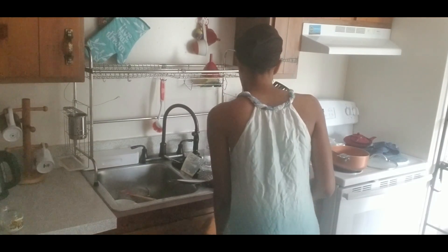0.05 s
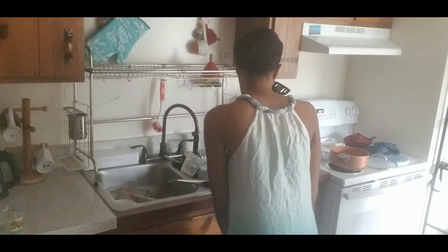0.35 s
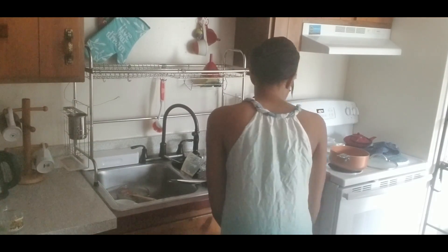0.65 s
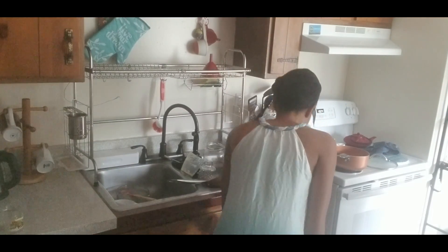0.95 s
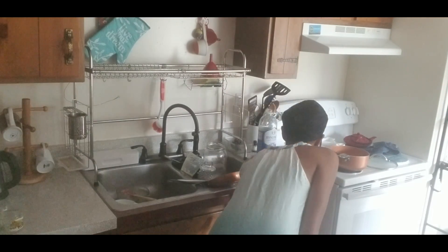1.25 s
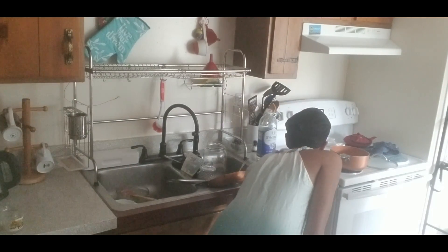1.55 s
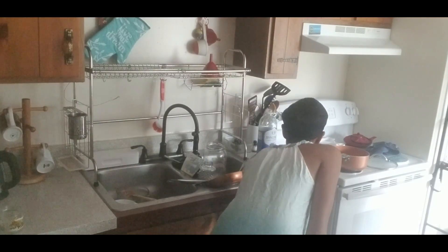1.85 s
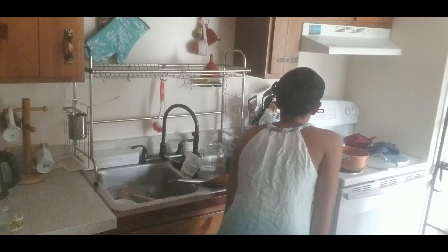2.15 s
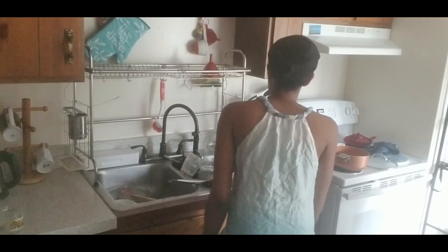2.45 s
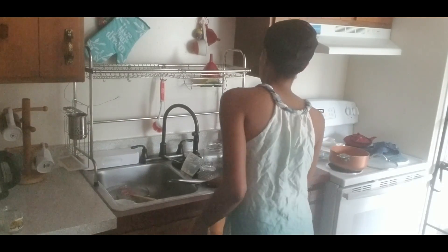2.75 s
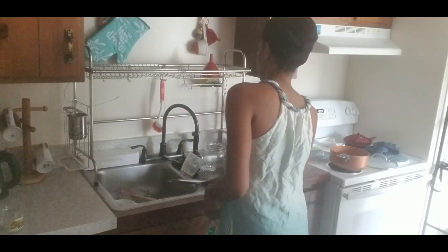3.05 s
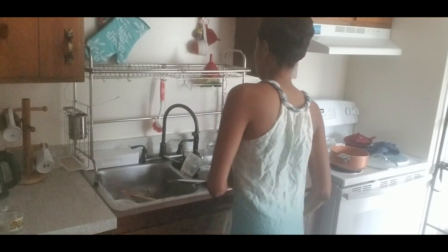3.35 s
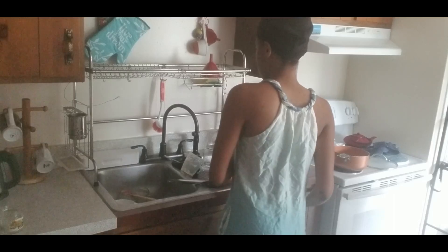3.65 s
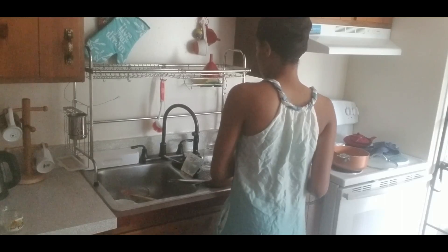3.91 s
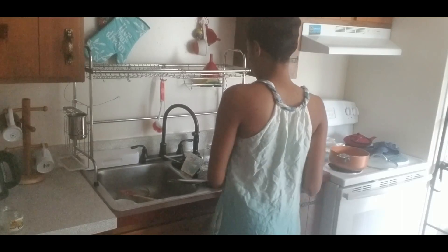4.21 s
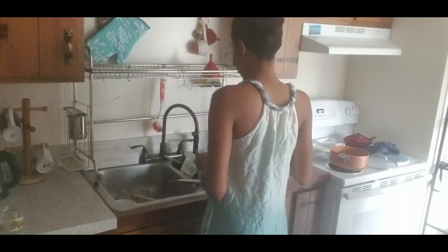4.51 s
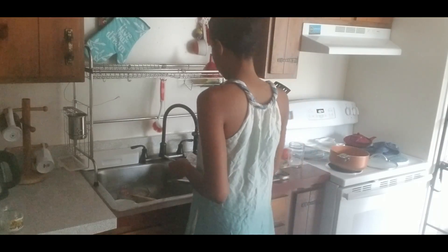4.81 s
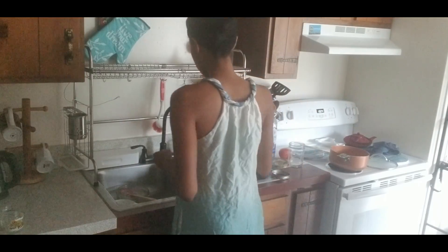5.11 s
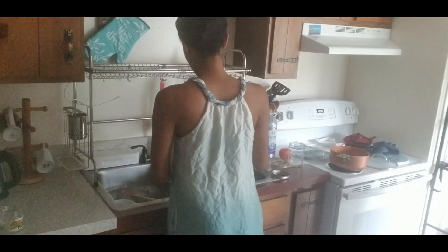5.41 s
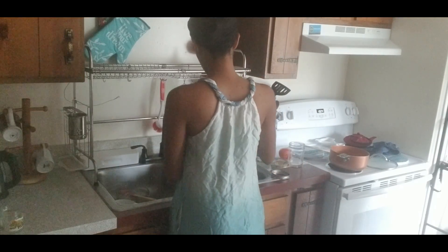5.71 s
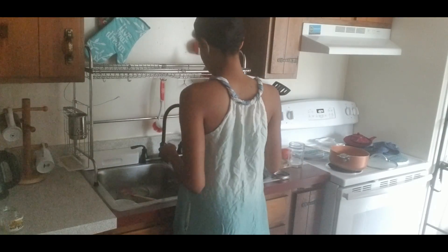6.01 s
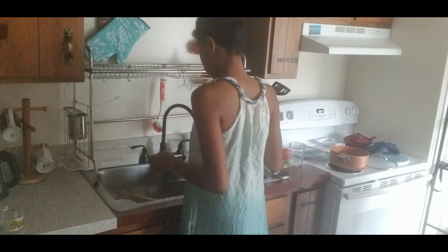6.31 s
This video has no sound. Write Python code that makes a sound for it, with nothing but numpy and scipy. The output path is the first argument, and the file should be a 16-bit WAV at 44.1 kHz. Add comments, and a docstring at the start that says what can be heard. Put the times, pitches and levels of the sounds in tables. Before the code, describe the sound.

Over a low fridge hum, dishes knock, a cupboard door clacks and something heavy slides with deep thumps, then a tap handle squeaks.

```python
"""A refrigerator hums in a small hard kitchen, and a cupboard door clacks, its steel catch ringing.
A couple of metres from the microphone, on the left, someone works at a steel sink. A hollow container
is picked up with a low hoot; dishes knock and set the cabinet's panels booming, and something heavy
slides. The tap handle sticks and slips in a squeak, its lever clicks, and at the very end water hisses."""
import sys
import numpy as np
from scipy import signal
from scipy.fft import rfft, irfft, next_fast_len
from scipy.io import wavfile
from scipy.ndimage import uniform_filter1d

SR = 44100
rng = np.random.default_rng(int(sys.argv[2]) if len(sys.argv) > 2 else 0)


def generate_wav(sig):
    """Save sig (samples, or channels by samples) to the path in sys.argv[1] as 16-bit PCM at SR."""
    pcm = np.round(np.clip(np.atleast_2d(sig).T, -1, 1) * 32767).astype(np.int16)
    wavfile.write(sys.argv[1], SR, pcm)


N = 280719
TIME = np.arange(N) / SR
HIT_TIME = TIME[:SR * 4 // 5]


def undb(db):
    """Decibels to gain."""
    return 10 ** (np.asarray(db) / 20)


def rms(x):
    """Root mean square."""
    return np.sqrt(np.mean(x ** 2)) + 1e-12


def on_log_axis(hz, points):
    """Read (frequency, value) points on a log-frequency axis."""
    point_hz, value = np.transpose(points)
    return np.interp(np.log(hz + 1e-3), np.log(point_hz), value)


def colour(x, points):
    """Minimum-phase filter through (frequency [Hz], gain [dB]) points."""
    size = 2 * next_fast_len(x.shape[-1])
    gain = undb(on_log_axis(np.fft.rfftfreq(size, 1 / SR), points))
    cepstrum = irfft(np.log(gain))
    cepstrum[1:size // 2] *= 2
    cepstrum[size // 2 + 1:] = 0
    return irfft(rfft(x, size) * np.exp(rfft(cepstrum)))[..., :x.shape[-1]]


def band(x, lo, hi):
    """Steep band-pass."""
    return signal.sosfilt(signal.butter(4, [lo, min(hi, .49 * SR)], "band", fs=SR, output="sos"), x)


def wander(rate_hz):
    """Smooth random motion with a spread near 1."""
    size = int(SR / rate_hz)
    return uniform_filter1d(np.repeat(rng.standard_normal(N // size + 1), size), size)[:N]


def white_pair(size, alike):
    """White noise at two microphones; `alike` is the share of power common to both."""
    common, *own = rng.standard_normal((3, size))
    return np.sqrt(alike) * common + np.sqrt(1 - alike) * np.array(own)


def noise(points, alike, flicker_db):
    """Coloured, flickering stereo noise; its middle has rms 1."""
    x = colour(white_pair(N, alike) * undb(flicker_db * wander(90)), points)
    return x / rms(x.mean(0))


def pan(x, left_db):
    """Lean a sound towards the left microphone."""
    return x * undb(np.array([[left_db], [-left_db]]) / 2)


def add(out, time_s, x):
    """Mix a sound in at a time."""
    start = int(time_s * SR)
    out[:, start:start + x.shape[-1]] += x[..., :N - start]


def fade(t60):
    """Exponential decay, 60 dB in t60 seconds."""
    return undb(-60 * HIT_TIME / max(t60, .003))


def stroke(time_s, length_s, attack_s, release_s):
    """Gain of one movement: it rises, holds, then falls 60 dB in the release time."""
    rise = np.clip((TIME - time_s) / attack_s, 0, 1)
    return rise * undb(-60 * np.maximum(TIME - time_s - length_s, 0) / release_s)


def ring(modes, detune=0.):
    """Damped modes; detune shifts their pitches a little with each grip."""
    out = 0
    for hz, db, t60 in modes:
        hz = hz * (1 + detune * rng.standard_normal())
        out = out + undb(db) * fade(t60) * np.sin(2 * np.pi * hz * HIT_TIME)
    return out


# the small hard room's reverberation: (frequency [Hz], t60 [s])
ROOM_DECAY = [(150, 0.83), (500, 0.3), (1400, 0.25), (4000, 0.34), (9000, 0.26), (15000, 0.14)]
def kitchen(x, direct_db):
    """The path to the microphone: direct sound, early reflections, then a diffuse tail."""
    tail = 0
    for lo in 100 * 2. ** np.arange(8):
        waves = white_pair(len(HIT_TIME), alike=1 / (1 + (lo / 460) ** 4))  # long waves arrive alike
        early = undb(6) * fade(.085)  # off the worktop and the wall behind it
        late = fade(on_log_axis(lo * np.sqrt(2), ROOM_DECAY))
        tail = tail + band(waves, lo, 2 * lo) * (early + late)
    tail = tail * (1 - fade(.0087))
    response = tail / np.sqrt(np.sum(tail ** 2) / 2)
    response[[0, 1], [2, 0]] += undb(direct_db)  # the two sides are two samples apart
    return signal.fftconvolve(np.atleast_2d(x), response, axes=1)[:, :x.shape[-1]]


# fan and compressor tones, left of the microphone: (frequency [Hz], level [dB])
HUM_TONES = [(52.1, -57), (59.3, -54.5), (94, -69), (104.2, -71), (120, -55.5), (208.4, -56.5),
             (237.2, -72)]
# the rumble and hiss behind them: (frequency [Hz], gain [dB])
RUMBLE_COLOUR = [(25, -8), (50, -49), (78, 5), (135, -9), (190, 3), (225, 3), (255, -1), (300, -8.5),
                 (400, -16), (600, -49)]
HISS_COLOUR = [(180, -26), (300, -1), (526, -8.5), (892, -24.5), (1070, -23.5), (2170, -32), (3020, -30.5),
               (3230, -34), (5660, -31.5), (8560, -36), (12100, -26.5), (15500, -27.5)]
def refrigerator():
    """Fan and compressor beat against each other over a soft rumble and a thin hiss."""
    hum = 0
    for hz, db in HUM_TONES:
        phase = 2 * np.pi * (hz * TIME + rng.random()) + .07 * wander(5)
        hum = hum + undb(db) * np.sqrt(2) * np.sin(phase)
    rumble = undb(-58) * noise(RUMBLE_COLOUR, alike=.85, flicker_db=-1.6)
    hiss = undb(-65.5) * noise(HISS_COLOUR, alike=.17, flicker_db=.5)
    return pan(hum + rumble, left_db=5) + pan(hiss, left_db=4.5)


# something thin is nudged, off to the left: (time [s], level [dB])
NUDGES = [(.5, -74), (.63, -85), (1.33, -73), (1.79, -78.5), (2.0, -82), (5.4, -84)]
def thin_ring(hz=3030):
    """One faint, wavering high tone swells at each nudge and dies away."""
    gain = sum(undb(db) * stroke(time_s, .035, attack_s=.035, release_s=.86) for time_s, db in NUDGES)
    tone = np.sin(2 * np.pi * hz * TIME + .89 * wander(90))
    return pan(tone * gain, left_db=7)


# hands and things brushing past, well to the left: (time [s], length [s], level [dB])
TOUCHES = [(0.05, 0.068, -66.5), (0.387, 0.048, -71), (0.59, 0.076, -69), (1.229, 0.094, -66.5),
           (1.322, 0.047, -64.5), (1.438, 0.028, -73.5), (1.57, 0.016, -67.5), (1.753, 0.027, -70.5),
           (1.93, .02, -80), (5.38, 0.043, -75)]
# their rustle: (frequency [Hz], gain [dB])
TOUCH_COLOUR = [(300, -20), (600, 8), (900, -1), (1500, -1), (2300, -5.5), (3100, -3), (3600, -5.5),
                (7000, -6.5), (13000, -8.5), (15500, -5.5)]
# bumps on the container: (time [s], level [dB])
CONTAINER_BUMPS = [(1.238, -34), (1.259, -34.5)]
# the air inside it: (frequency [Hz], level [dB], t60 [s])
CAVITY_MODES = [(290, -8, 0.18), (363.8, 4, 0.18), (454, -14, 0.11), (602, -10.5, 0.061)]
def container():
    """A hollow container brushes its neighbours; bumped, its air gives a low hoot."""
    touch = sum(undb(db) * stroke(time_s, length_s, attack_s=.02, release_s=.58)
                for time_s, length_s, db in TOUCHES)
    out = noise(TOUCH_COLOUR, alike=.039, flicker_db=1.95) * touch
    for time_s, db in CONTAINER_BUMPS:
        add(out, time_s, undb(db) * ring(CAVITY_MODES) * (1 - fade(.038)))
    return pan(out, left_db=8)


def tap_squeak(time_s=4.509, turn_s=.055, start_hz=4550, rise_hz=270):
    """The handle sticks and slips ever faster as it turns, strongest on its second harmonic."""
    turn = np.clip((TIME - time_s) / turn_s, 0, 1)
    hz = (start_hz + rise_hz * turn ** 2) * (1 + .007 * wander(470))
    phase = 2 * np.pi * np.cumsum(hz) / SR
    squeak = undb(-69) * np.sin(phase) + undb(-48) * np.sin(2 * phase)
    squeak *= stroke(time_s, length_s=.038, attack_s=.022, release_s=.13)
    return pan(kitchen(squeak, direct_db=-3), left_db=4)


# water at the spout, far left: (frequency [Hz], gain [dB])
WATER_COLOUR = [(180, -26), (320, -6), (600, -6), (850, -5), (1500, -13), (2300, -21.5), (4500, -19),
                (7000, -10), (10000, -15.5), (15500, -12.5)]
def tap_water(time_s=6.232, attack_s=.039, swell_db_per_s=116):
    """Water starts to hiss and swells as the valve opens."""
    open_s = np.maximum(TIME - time_s, 0)
    flow = np.minimum(open_s / attack_s, 1) * undb(-72 + swell_db_per_s * open_s)
    return pan(noise(WATER_COLOUR, alike=.097, flicker_db=2.5) * flow, left_db=9)


# the left microphone's lead for blows around the sink: (frequency [Hz], left over right [dB])
SINK_LEAN = [(60, 3.5), (380, 3.5), (700, 5), (1290, 7.5), (2380, 6.5), (4400, 8), (8120, 5), (15000, 1)]
def from_sink(x):
    """Place a sound at the sink: each microphone hears its own colour."""
    size = 2 * next_fast_len(N)
    left_db = on_log_axis(np.fft.rfftfreq(size, 1 / SR), SINK_LEAN)
    return irfft(rfft(x, size) * undb(np.array([left_db, -left_db]) / 2))[:, :N]


def blows(contacts, edges, shares_db, body, modes, modes_db, crack_db, direct_db):
    """Contacts crack, chatter and ring; hardness tilts four bands: thud, knock, clack and tick."""
    out = np.zeros((2, N))
    centres = np.sqrt(np.multiply(edges[:-1], edges[1:]))
    octaves = np.log2(centres / centres[1])
    for time_s, level_db, hardness, chatter_s in contacts:
        chatter = rng.standard_normal(len(HIT_TIME)) * fade(chatter_s)
        tone = ring(modes, detune=.01)
        contact = chatter / np.linalg.norm(chatter) + undb(modes_db) * tone / np.linalg.norm(tone)
        contact[0] += undb(crack_db)
        heard = colour(kitchen(contact, direct_db), body)
        for lo, hi, db in zip(edges, edges[1:], level_db + hardness * octaves + shares_db):
            part = band(heard, lo, hi)
            onset_rms = rms(part[:, :SR // 25].mean(0))  # first 40 ms
            add(out, time_s, part * undb(db) / onset_rms)
    return out


# the lever over the sink: (time [s], level [dB], hardness [dB/octave], chatter t60 [s])
LEVER_CLICKS = [(4.603, -63.5, 1.5, 0.023), (4.643, -63, -3, 0.016)]
# its thud, knock, clack and tick bands: (edge [Hz]) and (level [dB])
LEVER_EDGES = [150, 600, 1800, 4500, 15500]
LEVER_SHARES = [3, -2, -7.5, 5.5]
# its body: (frequency [Hz], gain [dB])
LEVER_BODY = [(150, -20), (330, 3), (520, -9.5), (780, -11), (1400, -19), (1980, -15), (2600, -11.5),
              (5500, -15.5), (7900, -2), (10000, -12), (15500, -11)]
# its ringing metal: (frequency [Hz], level [dB], t60 [s])
LEVER_RING = [(785, -5, 0.22), (1994, 4.5, 0.064), (7560, -3, 0.047)]
def lever():
    """The tap lever clicks home brightly and settles with a small knock."""
    return blows(LEVER_CLICKS, LEVER_EDGES, LEVER_SHARES, LEVER_BODY, LEVER_RING,
                 modes_db=-5.5, crack_db=3.5, direct_db=-5)


# the cupboard by the sink: (time [s], level [dB], hardness [dB/octave], chatter t60 [s])
DOOR_CLACKS = [(0.486, -50.5, -6, .03), (0.5, -51.5, -2.5, 0.23), (3.089, -52.5, -6.5, 0.019),
               (3.107, -49.5, -5.3, 0.15), (3.565, -42.5, -4.5, 0.026), (3.584, -59, 1.5, 0.036)]
# its thud, knock, clack and tick bands: (edge [Hz]) and (level [dB])
DOOR_EDGES = [150, 950, 2200, 5000, 15500]
DOOR_SHARES = [-6, -2.5, -2.5, -3.5]
# the door's body: (frequency [Hz], gain [dB])
DOOR_BODY = [(150, -2.5), (270, -3.5), (370, -4.5), (540, -3.5), (680, -10), (800, -0.5), (1000, -5),
             (1250, 1.5), (1650, -2.5), (2300, -17), (3300, -19), (5000, -30.5), (7300, -17.5),
             (10000, -24.5), (13000, -17.5), (15500, -21)]
# its panel and steel catch: (frequency [Hz], level [dB], t60 [s])
DOOR_RING = [(748, -1, .11), (824, -4, .14), (1520, -2, .1), (1750, -2, .12), (2778, -5, .13),
             (3321, -1, .17), (3650, -4, .13), (7294, 2, .14), (8699, -6, .14), (11370, -4, .14)]
def door():
    """The door clacks in quick pairs and its catch rings, heard mostly off the walls."""
    return blows(DOOR_CLACKS, DOOR_EDGES, DOOR_SHARES, DOOR_BODY, DOOR_RING,
                 modes_db=-10, crack_db=1, direct_db=-15.5)


# a heavy thing pulled twice, on the left: (time [s], length [s], rumble [dB], scrape [dB], hiss [dB])
PULLS = [(3.3, 0.58, -27, -50.5, -61.5), (3.979, .23, -35, -48.5, -54.5)]
# its low scrape and high rubbing hiss: (frequency [Hz], gain [dB])
DRAG_COLOUR = [(100, -49), (180, -5), (300, 5), (550, -4), (800, -10), (1200, -17), (2000, -31),
               (3500, -42), (7000, -56)]
RUB_COLOUR = [(600, 6), (1200, 6), (1900, -1), (2800, 1.5), (3500, -3.5), (4600, 2.5), (5600, -3),
              (6800, -5), (10000, -6.5), (15500, -9)]
def slide(mode_hz=68, sag_db_per_s=-33, swell_db=19):
    """Dragging keeps the cabinet's low mode going under an uneven scrape."""
    hz = mode_hz * (1 + .03 * wander(25))
    rumble = np.sin(2 * np.pi * np.cumsum(hz) / SR) * undb(2.2 * wander(30))
    scrape = noise(DRAG_COLOUR, alike=.7, flicker_db=2.2)
    hiss = noise(RUB_COLOUR, alike=.038, flicker_db=2.5)
    out = 0
    for time_s, length_s, rumble_db, scrape_db, hiss_db in PULLS:
        age = np.clip(TIME - time_s, 0, length_s)
        speed = np.sin(np.pi * age / length_s)
        easing = undb(sag_db_per_s * age)  # once the thing is moving
        body = (rumble * undb(rumble_db) + scrape * undb(scrape_db)) * easing
        rub = hiss * undb(hiss_db + swell_db * (speed - 1))
        out = out + (body + rub) * stroke(time_s, length_s, attack_s=.016, release_s=.13)
    return pan(out, left_db=4.5)


# weight landing at the sink: (time [s], level [dB], push length [s], pitch of the spot struck [ratio])
LANDINGS = [(1.775, -45, .008, .85), (3.2525, -10.5, .005, 1), (3.284, -19, .005, 1),
            (3.494, -22.5, .006, 1), (3.5254, -25, .005, 1), (3.803, -38, .003, 1), (3.826, -29, .007, 1),
            (3.873, -30, .009, 1), (4.9165, -33, .003, .9), (4.942, -30, .004, .8), (4.981, -32, .006, .79)]
# the cabinet underneath: (frequency [Hz], level [dB], t60 [s])
PANEL_MODES = [(52, -9, .14), (67, -10, .7), (77, -4, .2), (97, 0, .35), (208, -21, .25), (248, -23, .3)]
def cabinet():
    """Soft pushes set the big panels booming; the slowest motion radiates nothing."""
    out = np.zeros((2, N))
    for time_s, db, push_s, ratio in LANDINGS:
        push = np.sin(np.pi * np.minimum(HIT_TIME / push_s, 1))
        panels = ring([(hz * ratio, mode_db, t60 / ratio) for hz, mode_db, t60 in PANEL_MODES])
        boom = signal.fftconvolve(-push, panels)[:len(push)]
        add(out, time_s, boom * undb(db) / np.abs(boom).max())
    return pan(band(out, 35, 700), left_db=3.3)


# dishes a couple of metres away: (time [s], level [dB], hardness [dB/octave], chatter t60 [s])
DISH_KNOCKS = [(0.116, -65.5, -7.5, 0.054), (1.466, -67, -8, 0.0071), (1.589, -68, -9, 0.018),
               (1.675, -74, -11, 0.022), (1.765, -70, -2.5, 0.017), (3.2495, -36, -5.5, 0.008),
               (3.261, -43, -3.5, 0.042), (3.280, -46.5, -6, 0.045), (3.397, -51.5, -6.5, 0.0095),
               (3.491, -45, -6.5, 0.015), (3.802, -61, 3.5, 0.07), (3.822, -49, -4.5, 0.019),
               (3.883, -70.5, 5.5, .012), (3.8945, -42, 0, 0.01), (4.131, -75.5, 5, 0.0027),
               (4.912, -66.5, -2.5, 0.057), (4.941, -71.5, -13, 0.082)]
# their thud, knock, clack and tick bands: (edge [Hz]) and (level [dB])
DISH_EDGES = [150, 600, 1800, 4500, 15500]
DISH_SHARES = [-3, 0.5, -2, -2]
# the body of each knock: (frequency [Hz], gain [dB])
DISH_BODY = [(88, -30), (150, -3.5), (190, -2), (300, 0), (390, 1.5), (520, -4), (680, -13), (766, -10.5),
             (1040, -15.5), (1170, -14.5), (1320, -16.5), (1540, -17.5), (2100, -20.5), (2900, -22),
             (4140, -35), (7410, -29.5), (15500, -34.5)]
# their resonances: (frequency [Hz], level [dB], t60 [s])
DISH_RING = [(307, -3, .16), (375, 0, .15), (504, -1, .14), (750, -2, .13), (967, -4, .11), (1166, 0, .12),
             (1463, -3, .1), (1715, -2, .1), (2225, -4, .09), (2937, -5, .09)]
def dishes():
    """Dishes and utensils are set down in and around the sink with short, hard knocks."""
    return blows(DISH_KNOCKS, DISH_EDGES, DISH_SHARES, DISH_BODY, DISH_RING,
                 modes_db=-19, crack_db=-17.5, direct_db=-7)


def scene():
    """The kitchen from where the microphone stands, with the sink to its left."""
    handling = from_sink(dishes() + door() + lever()) + cabinet() + slide() + container()
    return handling + tap_squeak() + tap_water() + refrigerator() + thin_ring()


def record(dry, top_hz=15850):
    """The phone cuts the top treble steeply."""
    return signal.sosfilt(signal.ellip(10, .2, 70, top_hz, fs=SR, output="sos"), dry)


dry = scene()
out = record(dry)
generate_wav(out)
```